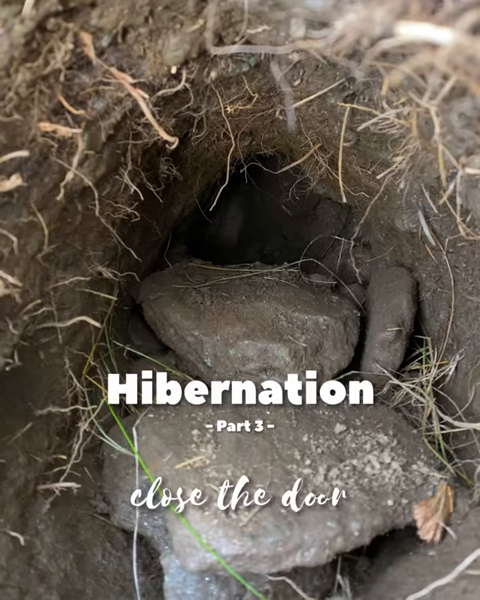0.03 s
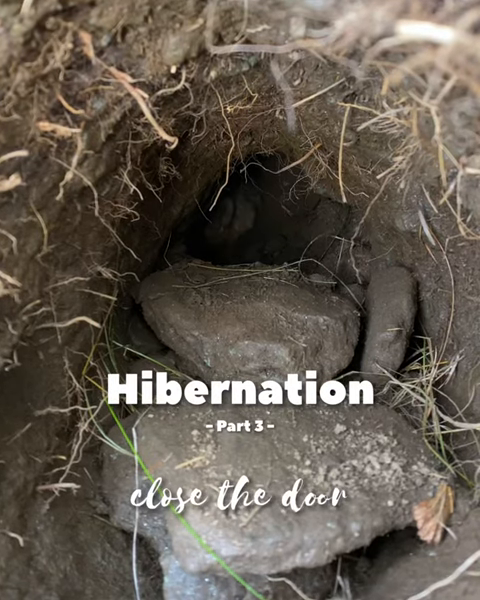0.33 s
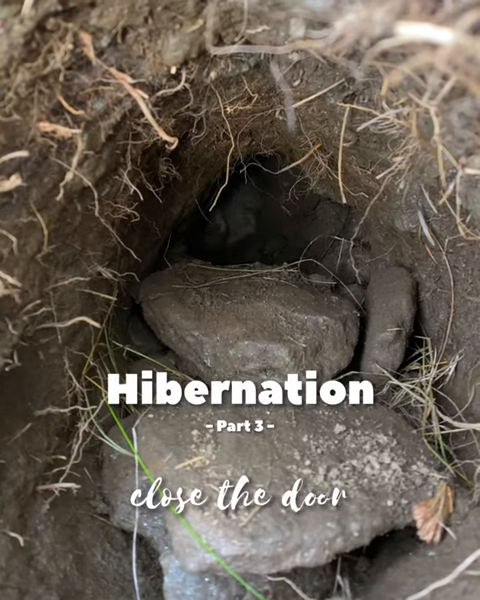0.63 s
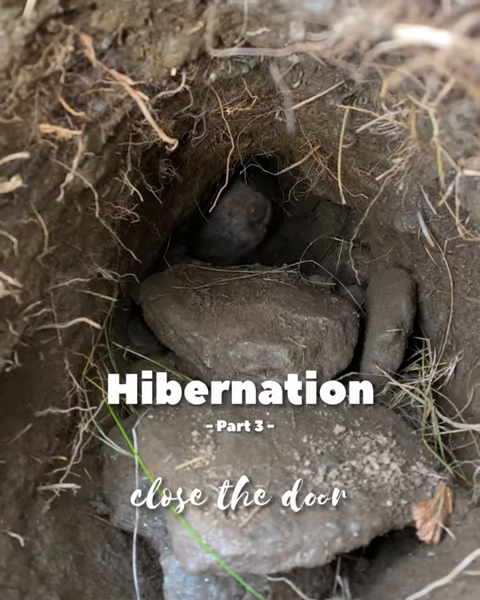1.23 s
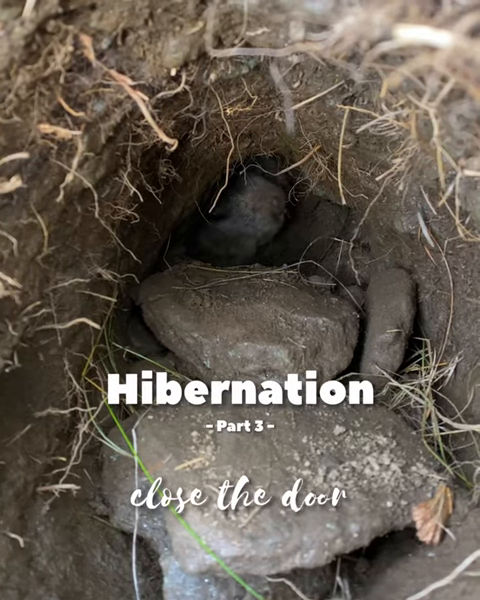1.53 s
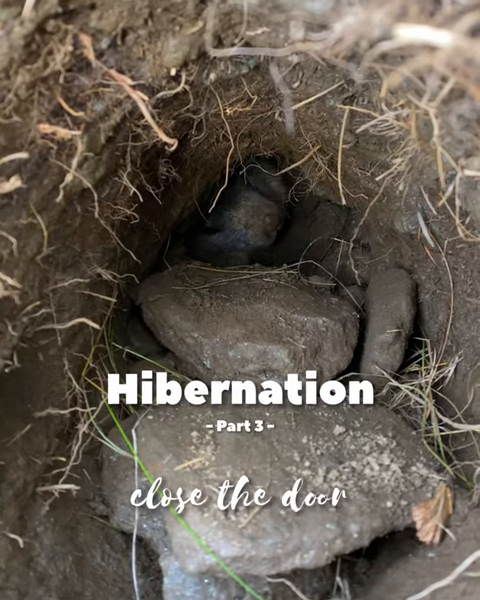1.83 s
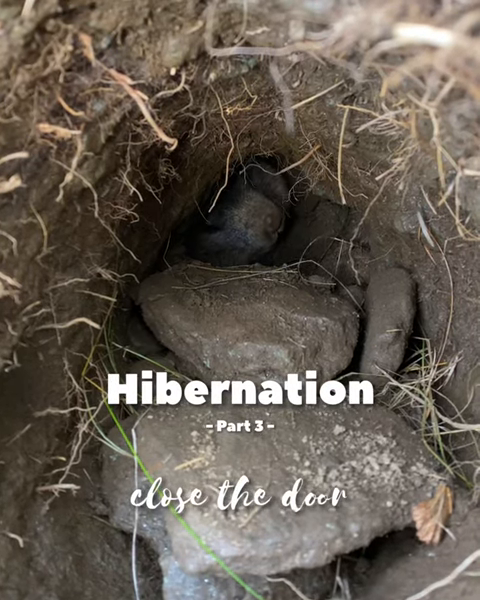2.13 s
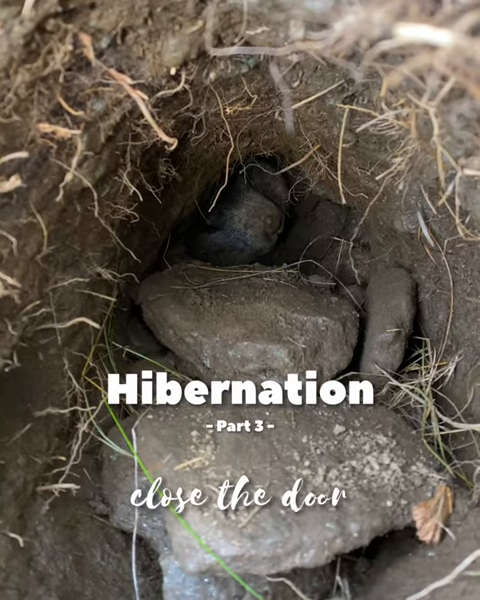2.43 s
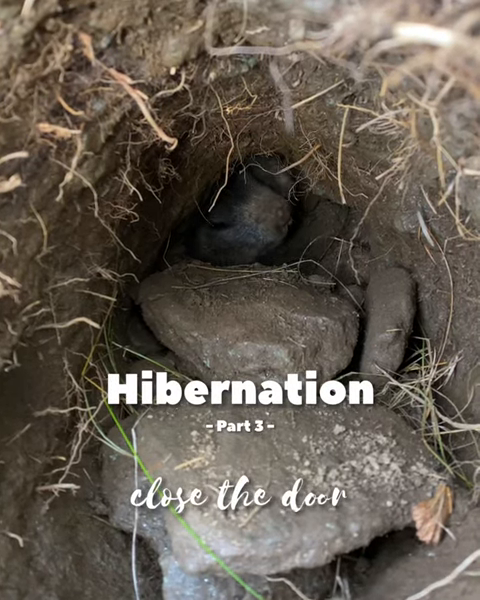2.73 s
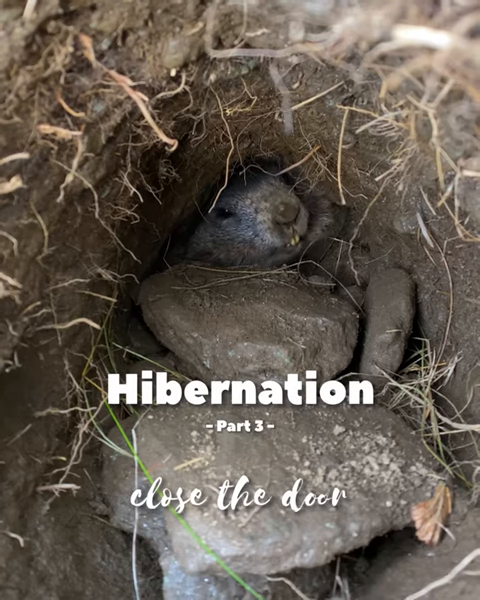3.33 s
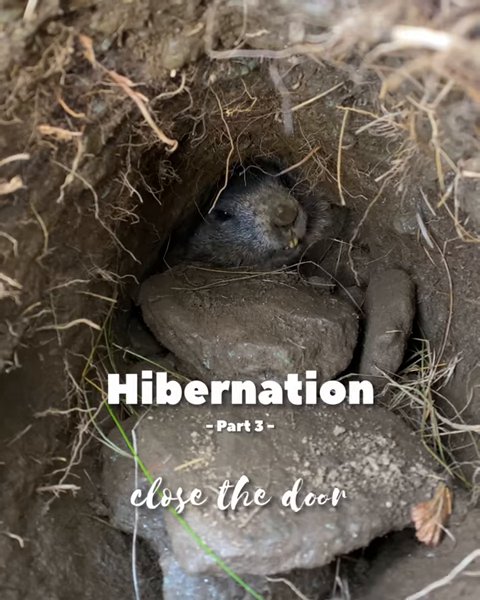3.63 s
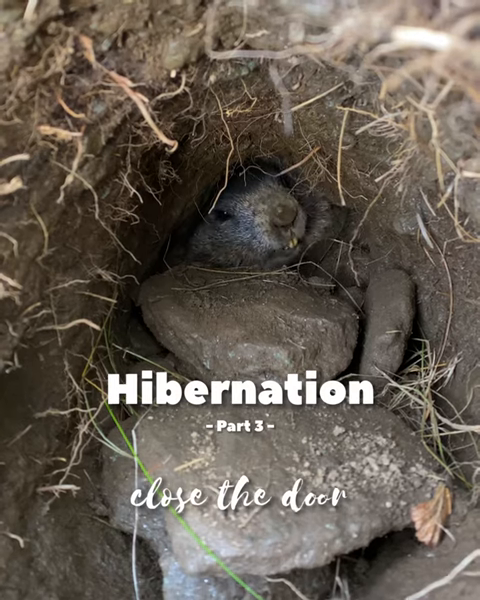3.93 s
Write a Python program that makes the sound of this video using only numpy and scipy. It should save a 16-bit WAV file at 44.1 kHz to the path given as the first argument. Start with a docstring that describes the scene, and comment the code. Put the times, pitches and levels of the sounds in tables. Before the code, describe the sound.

A small animal pushes earth in soft, irregular thuds close to the microphone at a burrow's mouth. Soil scuffs, grit ticks and claws scrape faintly between the pushes, over a steady low hum and rumble.

```python
"""At the mouth of a burrow, close to the microphone, a marmot packs earth and stones.
Each push is a soft thud whose treble arrives before its bass, because the ground is dispersive.
Friction makes soil scuff, claws scrape and fur drag; small impacts make grit tick and stones clack,
and the body bumps the ground. Under it lie a low, engine-like hum with rumble, a few puffs of air
and a faint hiss."""
import sys
import numpy as np
from scipy import signal
from scipy.fft import rfft, irfft
from scipy.io import wavfile

SR = 44100
rng = np.random.default_rng(int(sys.argv[2]) if len(sys.argv) > 2 else 0)


def file_out(sig):
    """Save sig as 16-bit WAV at sys.argv[1]."""
    # one column per channel
    cols = np.atleast_2d(sig).T
    # limit, then scale
    lim = np.clip(cols, -1, 1)
    pcm = np.round(lim * 32767).astype(np.int16)
    wavfile.write(sys.argv[1], SR, pcm)


N = 176400
T, HZ = np.arange(N) / SR, np.arange(N // 2 + 1) * SR / N

# Pushes on packed earth. Each row: start in seconds, level in dB, bass gain in dB,
# approximate delay at 1 kHz in milliseconds.
PUSHES = [(0.0359, -43, -18, 1.406), (0.0403, -41, 6.5, 1.138), (0.4086, -40, -1, 1.4),
          (0.7729, -40, 0.5, 1.3), (0.991, -37, 1.5, 1.4), (.9950, -36.5, -1.5, 1.1),
          (1.299, -36, -6.5, 1.505), (1.594, -39, -7, 1.32), (1.8493, -42.5, -12, 1.77),
          (1.855, -49.5, 11.5, 1.68), (2.6458, -42.5, -6, 1.63), (2.651, -41.5, -4.5, 1.466),
          (3.0795, -42.5, -9.5, 1.195), (3.0826, -36.5, -1, 1.022), (3.3683, -35, -4, 1.33)]
# Strokes through loose soil. Each row: start and length in seconds, level in dB, treble gain in dB.
SOIL_STROKES = [(0.025, 0.08, -72, -19), (0.093, 0.16, -83.5, 14.5), (0.18, 0.089, -71.5, -4),
                (0.408, 0.068, -79, 8), (0.478, 0.19, -84, 8), (0.606, 0.13, -75, -13),
                (0.78, 0.056, -73, -1), (0.882, 0.17, -72.5, -5), (0.992, 0.091, -66.5, -8),
                (1.093, 0.09, -65, -8), (1.184, 0.061, -71, 6), (1.244, 0.082, -71.5, 8),
                (1.295, 0.12, -66, -9), (1.595, 0.057, -64, -18), (1.849, 0.096, -65.5, -23),
                (2.642, 0.097, -64, -6.5), (2.802, 0.14, -62.5, -13.5), (3.081, 0.1, -60.5, -10),
                (3.184, 0.13, -74.5, 5.5), (3.398, 0.17, -80, -3)]
# Spectra of rubbed soil, falling crumbs and low rumble. Each row: frequency in Hz, gain in dB.
SOIL_SPECTRUM = [(100, -2.5), (300, 15), (600, 4.5), (1000, 0), (1600, -8.5), (2300, -14), (3200, -14),
                 (4500, -19), (7000, -14), (10000, -20.5), (14000, -45)]
CRUMB_SPECTRUM = [(400, -10.5), (1200, -0.5), (1700, 5), (2100, -4.5), (2900, 2.5), (4000, -4.5),
                  (7000, -3), (14000, -33)]
RUMBLE_SPECTRUM = [(20, -35), (40, -7), (60, 1.5), (120, -2.5), (150, -9.5), (190, -17.5), (260, -27),
                   (400, -40.5), (1000, -74.5)]

GRAINS_PER_S, GRAIN_SPREAD_DB = 3500, 2
GRIT_RING_S, GRIT_WIDTH = 0.0021, 1.33


def undb(db):
    """Decibels to amplitude ratio."""
    return 10 ** (np.asarray(db) / 20)


def unit(x):
    """Normalisation to an rms of 1."""
    return x / np.sqrt(np.mean(x ** 2))


def curve(points):
    """Gain at every frequency, interpolated from (Hz, dB) points on logarithmic axes."""
    hz, db = np.array(points).T
    return undb(np.interp(np.log(HZ + 1), np.log(hz), db))


def colour(x, gain):
    """Minimum-phase filter, normalised so that white noise keeps its level."""
    cepstrum = irfft(np.log(unit(gain)))
    cepstrum[1:N // 2] *= 2
    cepstrum[N // 2 + 1:] = 0
    return irfft(rfft(x) * np.exp(rfft(cepstrum)))


def butterworth(x, order, hz, kind):
    """Maximally flat filter with its edge or edges at hz."""
    return signal.sosfilt(signal.butter(order, hz, kind, fs=SR, output="sos"), x)


def stereo(pair, width):
    """Sum and difference turn mid and side into left and right."""
    mid, side = pair
    return np.array([mid + width * side, mid - width * side]) / np.sqrt(1 + width ** 2)


def pan(left_db):
    """Channel gains for a level difference of left over right."""
    return undb(np.array([[left_db], [-left_db]]) / 2)


def noise():
    """Two uncorrelated white noises."""
    return rng.standard_normal((2, N))


def walk(rate):
    """Random drift of spread near 1, with rate turning points a second."""
    return np.interp(T * rate, np.arange(1024), rng.standard_normal(1024))


def grains(rate, spread_db):
    """Shot noise: two channels of tiny impacts, random in time and unequal in size."""
    impacts = noise() * (rng.random(N) < rate / SR)
    size_db = spread_db * np.minimum(rng.exponential(size=N), 5)
    return unit(impacts * undb(size_db))


def stroke(start, length):
    """Envelope of a rubbing stroke: quick rise, hold, slow fall."""
    return np.interp((T - start) / length, [0, 0.22, 0.41, 1.1], [0, 1, 1, 0])


def strokes(rows):
    """Summed envelope of strokes given as start, length and level in dB."""
    return sum(undb(db) * stroke(at, length) for at, length, db in rows)


def ring(start, decay):
    """Envelope of a damped vibration: sudden onset, exponential decay."""
    return (T >= start) * np.exp(-np.clip((T - start) / decay, 0, 50))


def stick_slip(x):
    """Uneven catching and slipping modulates the level of a friction noise."""
    return unit(x * undb(4.5 * walk(rate=55)))


def with_treble(x, events, crossover_hz=2480):
    """A crossover gives each event, an (envelope, treble gain) pair, its own brightness."""
    low = butterworth(x, 2, crossover_hz, "low")
    high = butterworth(x, 2, crossover_hz, "high")
    low_envelope = sum(envelope for envelope, _ in events)
    high_envelope = sum(envelope * treble for envelope, treble in events)
    return low * low_envelope - high * high_envelope  # the two bands are in antiphase


def background():
    """Harmonics of a wavering, missing fundamental hum over slowly fading rumble and a wide hiss."""
    # Partials of the hum. Each row: harmonic number, rms level in dB.
    harmonics = [(2, -54.5), (3, -62), (4, -59), (5, -65)]
    # Spectrum of the hiss. Each row: frequency in Hz, gain in dB.
    hiss_spectrum = [(100, 7), (700, 1), (1200, -9), (2000, -13.5), (3000, -12), (4200, -17), (5400, -13),
                     (7500, -18.5), (10500, -22), (12500, -37.5)]
    fundamental_hz, fade_db_per_s = 29.844, 1.7
    phase = 2 * np.pi * np.cumsum(fundamental_hz * (1 + 0.0077 * walk(rate=5))) / SR
    hum = 0
    for number, db in harmonics:
        amplitude = np.sqrt(2) * undb(db + 1.66 * walk(rate=6))
        hum += amplitude * np.sin(number * phase + 2 * np.pi * rng.random())
    rumble = colour(stereo(noise(), width=1.06), curve(RUMBLE_SPECTRUM)) * pan(left_db=1)
    rumble_db = -51.5 + 3 * walk(rate=7.6) - fade_db_per_s * (T - T.mean())
    hiss = colour(stereo(noise(), width=1.57), curve(hiss_spectrum))
    return hum + undb(rumble_db) * rumble + undb(-76.5) * hiss


def scuffs():
    """Granular friction: soil grains catch and slip under each stroke of paw or snout."""
    impacts = stereo(grains(GRAINS_PER_S, GRAIN_SPREAD_DB), width=1)
    soil = stick_slip(colour(impacts, curve(SOIL_SPECTRUM)))
    rubs = [(undb(db) * stroke(at, length), undb(treble)) for at, length, db, treble in SOIL_STROKES]
    return with_treble(soil, rubs)


def crumbs(settle_s=0.26):
    """Sparse damped impacts: crumbs trickle after each scuff, fading exponentially as they settle."""
    t = T[:SR // 100]
    impacts = grains(rate=220, spread_db=3)
    snap = rng.standard_normal((2, len(t))) * np.exp(-t / GRIT_RING_S)
    fall = signal.fftconvolve(impacts, snap, axes=1)[:, :N]
    trickle = unit(colour(stereo(fall, GRIT_WIDTH), curve(CRUMB_SPECTRUM)))
    stirred = np.minimum(sum(ring(at, settle_s) for at, _, _, _ in SOIL_STROKES), 1)
    return undb(-86.5) * trickle * stirred


def thuds():
    """Dispersion: the ground carries treble faster, so each push chirps down, with a diffuse tail."""
    # Spectrum of a push on packed earth. Each row: frequency in Hz, gain in dB.
    earth_spectrum = [(30, -23), (70, -5.5), (220, 2.5), (350, -13), (470, -21), (640, -16.5),
                      (1100, -26.5), (1750, -40.5), (3000, -46.5), (15000, -86.5)]
    bass_hz, knee_hz, tail_s, side_s, left_lag_s = 325, 40.8, 0.024, 0.0023, 0.00013
    bass_shelf = 1 / (1 + (HZ / bass_hz) ** 4)
    dispersion = 2 * np.pi * np.log(1 + HZ / knee_hz)
    earth = curve(earth_spectrum)
    earth /= np.abs(irfft(earth * np.exp(-1j * dispersion))).max()
    spectrum, t = 0, T[:SR // 5]
    tail, burst = np.exp(-t / tail_s), np.exp(-t / side_s)
    for start, db, bass_db, lag in PUSHES:
        scatter = rng.standard_normal((3, len(t)))
        paths = undb(-7.5) * scatter[:2] * tail / np.linalg.norm(tail)  # mid and side
        early_side = burst * scatter[2]
        paths[1] += undb(-13) * early_side / np.linalg.norm(early_side)
        paths[0, 0] += 1  # the direct wave
        phase = 2 * np.pi * HZ * start + lag * dispersion
        spectrum += rfft(paths, N) * undb(db + bass_db * bass_shelf) * np.exp(-1j * phase)
    arrival = np.exp(1j * np.pi * HZ * left_lag_s * np.array([[-1], [1]]))  # the right side leads
    return irfft(stereo(spectrum * earth, width=0.78) * arrival) * pan(left_db=-2)


def crunches(spread_s=0.0055, relative_db=-16, cutoff_hz=1600):
    """Yielding under load: soil crunches briefly as each push builds up and lets go."""
    load = sum(undb(db + relative_db) * np.exp(-np.minimum(np.abs(T - at) / spread_s, 50))
               for at, db, _, _ in PUSHES)
    muffled_soil = curve(SOIL_SPECTRUM) / (1 + (HZ / cutoff_hz) ** 2)
    return colour(stereo(noise(), width=1), muffled_soil) * load / 2


def bumps():
    """Soft shoves of the body rock the ground in low wave packets with Gaussian envelopes."""
    # Each row: centre time in seconds, peak level in dB, frequency in Hz, half-width in seconds.
    shoves = [(0.049, -31.5, 85, 0.0093), (.118, -43, 123, .014), (0.898, -37.5, 132, 0.0073),
              (1.103, -39.5, 95, 0.0075), (1.163, -34.5, 118.5, 0.011), (1.322, -42, 172, 0.01),
              (1.414, -37, 65.6, 0.013), (1.474, -39, 109, 0.012), (1.694, -43, 122, 0.012),
              (1.725, -38.5, 117.4, 0.0063), (2.46, -42.5, 99, 0.01), (2.675, -43, 133.5, 0.016),
              (2.893, -43, 158, 0.0077), (2.993, -40, 111.4, 0.017)]
    return sum(undb(db) * np.exp(-((T - at) / half_width) ** 2) * np.cos(2 * np.pi * hz * (T - at))
               for at, db, hz, half_width in shoves)


def ticks():
    """Impulsive excitation: grit and dry roots snap, each in a broad resonance of its own."""
    # Each row: start in seconds, level in dB, resonance frequency in Hz.
    snaps = [(0.114, -61.5, 9000), (.142, -63, 5000), (0.426, -61, 4930), (.6081, -55.5, 2960),
             (1.162, -56, 3420), (1.268, -63, 3650), (1.372, -60, 3530), (1.609, -52.5, 5700),
             (1.690, -58, 3500), (1.864, -55.5, 5900), (2.45, -55, 2930), (2.722, -58, 3380),
             (2.841, -56, 3580), (3.265, -58, 6340), (3.435, -57.5, 2900), (3.4621, -57.5, 5400),
             (3.4872, -51.5, 3250), (3.583, -62, 4500), (3.7578, -55.5, 7300)]
    out, t = np.zeros((2, N)), T[:SR // 40]
    for at, db, hz in snaps:
        snap = rng.standard_normal((2, len(t))) * np.exp(-t / GRIT_RING_S)
        resonance = butterworth(snap, 1, [hz / 1.034, hz * 1.12], "band")
        skirt = butterworth(snap, 2, [1200, 10500], "band")
        i = int(at * SR)
        out[:, i:i + len(t)] += undb(db) * (resonance + undb(-22.5) * skirt)
    return stereo(out, GRIT_WIDTH)


def stones():
    """Damped collisions: small stones knock together and the soil cuts their ringing short."""
    # Each row: start in seconds, level in dB, treble gain in dB, decay time in seconds.
    knocks = [(0.1937, -50, 13.5, 0.002), (1.205, -43.5, -10, .0045), (3.463, -49, -14, 0.0046)]
    # Spectrum of a clack. Each row: frequency in Hz, gain in dB.
    stone_spectrum = [(150, -1.5), (550, 17), (1400, 7), (2000, -31.5), (2700, 6.5), (4000, -12.5),
                      (7500, -3.5), (15000, -50)]
    clack = colour(stereo(noise(), width=2), curve(stone_spectrum))
    blows = [(undb(db) * ring(at, decay), undb(treble)) for at, db, treble, decay in knocks]
    return with_treble(clack, blows) / 2


def scrapes(count=100, decay_cycles=2, spread_db=2):
    """Stick-slip of claws on stone: each catch rings for a few cycles, higher in mid-stroke."""
    # Each row: start and length in seconds, level in dB, mid-stroke pitch in Hz, scatter in octaves.
    claw_strokes = [(0.206, 0.057, -76.5, 1280, 0.3), (0.626, .14, -89, 1690, .05),
                    (0.841, .065, -72, 990, .45), (1.406, .06, -70.5, 1096, 0.56),
                    (1.656, .07, -70.5, 1150, .6), (1.883, .06, -86.5, 2030, 0.069),
                    (2.802, 0.08, -64.5, 572, 0.31)]
    out, t = np.zeros((2, N)), T[:SR // 50]
    for at, length, db, hz, scatter in claw_strokes:
        detune, force, mid, side = rng.standard_normal((4, count, 1))
        progress = np.sort(rng.beta(2, 2, size=count))[:, None]
        octaves = scatter * (detune + np.sin(np.pi * progress) - 1)
        pitch = np.minimum(hz * 2 ** octaves, SR / 4)
        envelopes = np.exp(-pitch * t / decay_cycles) * undb(spread_db * force)
        catches = np.sin(2 * np.pi * pitch * t) * envelopes
        scrape = np.zeros((2, N))
        for k, when in enumerate(at + length * progress[:, 0]):
            i = int(when * SR)
            scrape[:, i:i + len(t)] += np.array([mid[k], side[k]]) * catches[k]
        out += undb(db) * unit(scrape) * np.sqrt(length * SR / N)
    return stereo(out, width=1)


def drags():
    """Sliding friction: fur catches and slips on the wall, hollow and dull from inside the tunnel."""
    # Each row: start in seconds, length in seconds, level in dB.
    slides = [(0.646, 0.013, -53), (0.65, 0.095, -70.5), (2.68, 0.2, -63), (2.794, 0.086, -57),
              (2.858, 0.18, -65.5), (2.964, 0.25, -64), (3.044, 0.018, -59), (3.798, 0.02, -66)]
    # Spectrum of fur on the wall. Each row: frequency in Hz, gain in dB.
    fur_spectrum = [(80, -25), (200, 7), (330, 3), (470, -4.5), (590, -4), (800, -22.5), (3000, -38),
                    (14000, -64)]
    friction = stereo(grains(GRAINS_PER_S, spread_db=0.67), width=0.6)
    return colour(friction * strokes(slides), curve(fur_spectrum))


def sizzles():
    """Shot noise in two very high resonances rides as a thin hiss on some of the pushes."""
    # Each row: start in seconds, length in seconds, level in dB.
    bursts = [(0.99, 0.097, -83.5), (1.296, 0.059, -75), (1.841, 0.1, -83.5), (2.634, 0.098, -83.5),
              (3.068, 0.11, -74.5)]
    # Each row: centre frequency in Hz, bandwidth in Hz, gain in dB.
    resonances = [(8520, 520, 6), (10160, 2000, 1)]
    response = sum(undb(db) / (1 + ((HZ - hz) / (width / 2)) ** 2) for hz, width, db in resonances)
    impacts = stereo(grains(GRAINS_PER_S, GRAIN_SPREAD_DB), width=2)
    return stick_slip(colour(impacts, response)) * strokes(bursts)


def sand():
    """Granular flow: fine grains slide off the wall in one trickle of tiny impacts."""
    impacts = stereo(grains(rate=500, spread_db=GRAIN_SPREAD_DB), width=1)
    return colour(impacts, curve(CRUMB_SPECTRUM)) * undb(-80.5) * stroke(start=1.044, length=0.35)


def buffets(thin_below_hz=290):
    """Pressure fluctuations: low puffs of air drive the two sides of the microphone in antiphase."""
    # Each row: start in seconds, length in seconds, level in dB.
    puffs = [(2.728, 0.23, -50), (3.22, 0.11, -50), (3.494, .16, -52)]
    air_spectrum = curve(RUMBLE_SPECTRUM) * HZ / (HZ + thin_below_hz) + 1e-6
    air = colour(rng.standard_normal(N), air_spectrum)
    return np.array([air, -air]) * strokes(puffs)


def click():
    """A single brief pressure pulse, heard as a dry click right at the microphone."""
    return undb(-42) * ring(start=3.3869, decay=0.001)


def tunnel(x, decay_s=0.0063, reflections_db=-1.5):
    """Early reflections: the close walls add a dense cluster of echoes to the direct sound."""
    t = T[:SR // 30]
    walls = rng.standard_normal((2, len(t))) * np.exp(-t / decay_s)
    walls *= undb(reflections_db) / np.linalg.norm(walls[0])
    reflected = signal.fftconvolve(x, walls, axes=1)[:, :N]
    return (x + reflected) / np.hypot(1, undb(reflections_db))


def scene():
    """Superposition of all the sources; only loose earth and stones reflect off the tunnel walls."""
    body = thuds() + crunches() + bumps() + drags() + scrapes()
    loose_earth = tunnel(scuffs() + sand() + stones() + crumbs())
    return body + loose_earth + ticks() + sizzles() + click() + buffets() + background()


def record(dry, cutoff_hz=15800):
    """The microphone pair's stereo width varies with frequency; the recorder low-passes the result."""
    # Response to the side signal. Each row: frequency in Hz, gain in dB.
    side_response = [(100, -0.5), (400, -3.5), (1050, 5.5), (1700, -1.5), (2500, 4), (3100, -1), (4400, 5),
                     (6000, -5), (10000, -1.5), (14000, 5)]
    mid = (dry[0] + dry[1]) / 2
    side = irfft(rfft(dry[0] - dry[1]) * curve(side_response)) / 2
    low_pass = signal.ellip(8, 0.2, 70, cutoff_hz, fs=SR, output="sos")
    return signal.sosfilt(low_pass, np.array([mid + side, mid - side]))


dry = scene()
out = record(dry)
file_out(out)
```